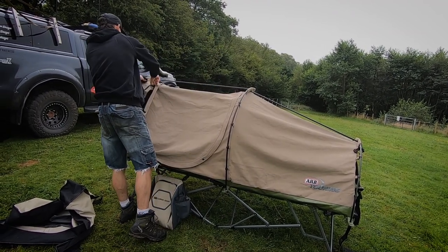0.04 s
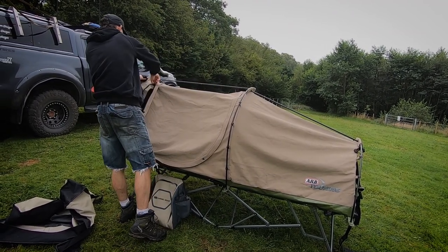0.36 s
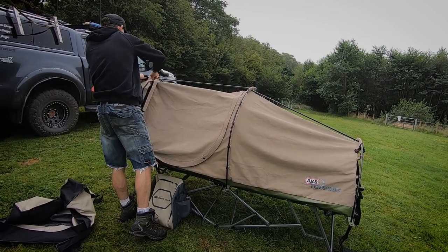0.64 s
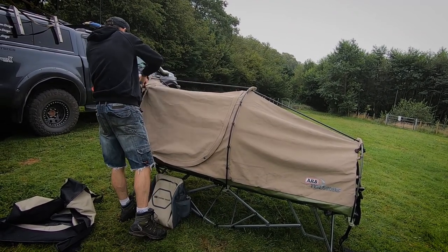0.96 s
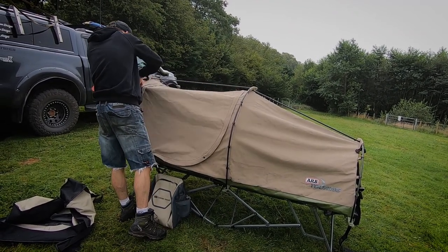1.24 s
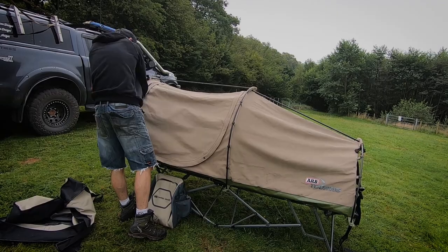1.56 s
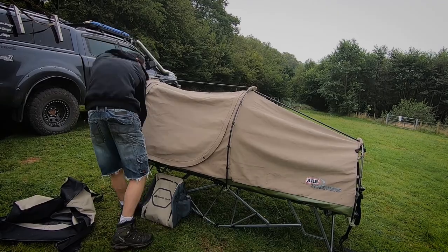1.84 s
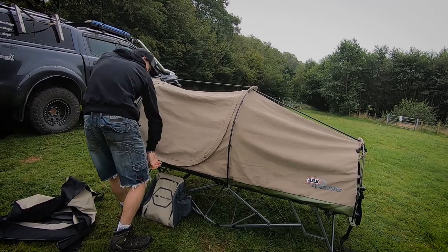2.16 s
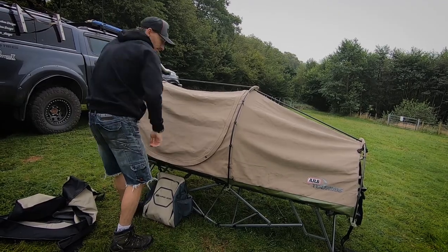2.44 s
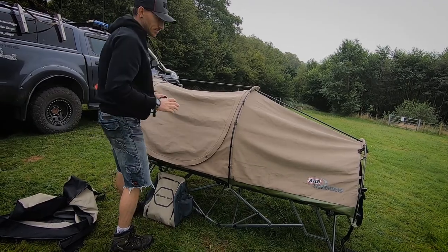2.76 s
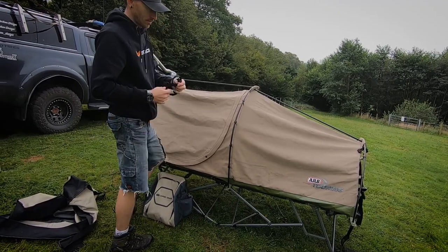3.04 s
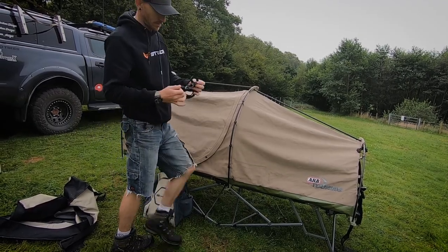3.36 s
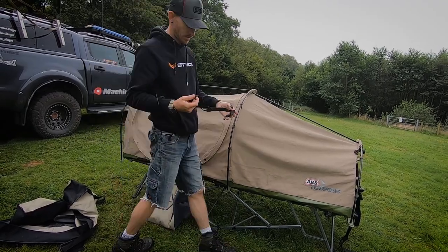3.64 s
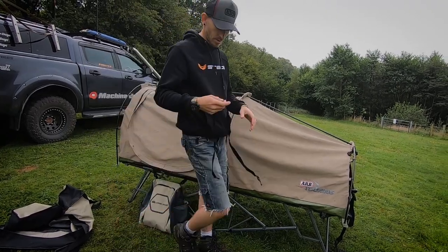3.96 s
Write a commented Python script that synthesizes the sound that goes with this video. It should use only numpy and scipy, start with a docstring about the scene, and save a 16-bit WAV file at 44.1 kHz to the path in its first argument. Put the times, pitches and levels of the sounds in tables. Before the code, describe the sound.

A tent zip rasps closed in uneven pulls and ends with a metallic clack outdoors.

```python
"""An open field, the microphone close to a canvas tent. A zip is drawn along the tent's edge:
a slow, catching pull, a short tug, then a long fast pull. The teeth buzz through the canvas and rasp
in the slider; the metal pull tabs jingle, and the slider clacks home at the end of the run.
Small birds call far off over the outdoor hush and a breeze rumbles on the microphone.
Late on, a shoe brushes the grass and a strap buckle clicks once."""
import sys
import numpy as np
from scipy import signal
from scipy.fft import rfft, irfft
from scipy.io import wavfile

SR = 44100
rng = np.random.default_rng(int(sys.argv[2]) if len(sys.argv) > 2 else 0)


def output_pcm(signal):
    """Save a mono or channel-first signal as 16-bit PCM at the path in sys.argv[1].

    Samples are clipped to [-1, 1] before scaling.
    """
    pcm = np.clip(np.atleast_2d(signal).T, -1, 1) * 32767
    wavfile.write(sys.argv[1], SR, np.round(pcm).astype(np.int16))


N = 176400
T = np.arange(N) / SR


def from_db(db):
    """Decibels to gain."""
    return 10 ** (np.asarray(db) / 20)


def rms_one(x):
    """Scale to unit rms."""
    return x / np.sqrt(np.mean(x ** 2) + 1e-20)


def in_time(rows):
    """Each column of a timed curve, at every sample."""
    times, *columns = np.transpose(rows)
    return [np.interp(T, times, column) for column in columns]


def during(rows):
    """One while a curve lasts, with 8 ms fades outside it."""
    return np.clip(np.minimum(T - rows[0][0], rows[-1][0] - T) / .008 + 1, 0, 1)


def drift(rate_hz):
    """Smooth random wander of unit rms."""
    hop, settle = 40, 2000
    pole = np.exp(-2 * np.pi * rate_hz * hop / SR)
    slow = signal.lfilter([1], [1, -2 * pole, pole * pole], rng.standard_normal(N // hop + settle + 2))
    slow = rms_one(slow[settle:])
    return np.interp(np.arange(N) / hop, np.arange(len(slow)), slow)


def colour(x, spectrum):
    """Minimum-phase filter of unit power gain that follows a spectrum's shape."""
    hz, db = np.transpose(spectrum)
    bin_hz = np.maximum(np.arange(N // 2 + 1) * SR / N, 1)
    gain = rms_one(from_db(np.interp(np.log(bin_hz), np.log(hz), db)))
    cepstrum = irfft(np.log(gain), N)
    cepstrum[1:N // 2] *= 2
    cepstrum[N // 2 + 1:] = 0
    return irfft(rfft(x) * np.exp(rfft(cepstrum)), N)


def noise(spectrum):
    """Coloured noise of about unit rms."""
    return colour(rng.standard_normal(N), spectrum)


def ring(clicks, pitches_hz, modes, spread_db):
    """Clicks ring a set of modes, each with a strength of its own at every hit."""
    out, hits = np.zeros(N), np.flatnonzero(clicks)
    for k, (hz, (db, t60)) in enumerate(zip(pitches_hz, modes)):
        radius, angle = from_db(-60 / (t60 * SR)), 2 * np.pi * hz / SR
        drive = np.full(N, 1e-18)
        drive[hits] = clicks[hits] * from_db(db + spread_db * rng.standard_normal(N)[hits])
        feedback = [1, -2 * radius * np.cos(angle), radius ** 2]
        out += (-1) ** k * signal.lfilter([0, np.sin(angle)], feedback, drive)
    return out


# The far hush of the field: (frequency [Hz], relative level [dB])
HUSH_SPECTRUM = [(25, -14.5), (40, -18.5), (64, -27), (110, -31.5), (170, -32), (280, -36.5), (400, -36),
                 (550, -37), (800, -31.5), (1100, -32), (1600, -38.5), (2480, -45), (4370, -49.5),
                 (7500, -55), (11000, -62.5), (16000, -69)]
# Its slight swell: (time [s], relative level [dB])
HUSH_SWELL = [(0.6, 1.5), (2.4, 2.5), (3.0, 1.5)]

def distant_hush(level_db=-50.5):
    """Open air in the distance, a soft noise whose level wavers."""
    return noise(HUSH_SPECTRUM) * from_db(level_db + in_time(HUSH_SWELL)[0] + 1.3 * drift(18))


# Breeze on the microphone: (time [s], level [dB])
BREEZE_LEVEL = [(0, -47), (0.5, -54.5), (1.2, -49), (1.85, -52.5), (2.2, -53.5), (4.0, -55.5)]
# Its rumble: (frequency [Hz], relative level [dB])
BREEZE_SPECTRUM = [(8, -23), (25, -5), (40, -5), (60, -4.5), (130, -15), (250, -28), (600, -49.5)]

def breeze(sway_hz=3.6, sway_db=-29.5):
    """Moving air rumbles at the microphone, over a slow sway of pressure."""
    rumble = noise(BREEZE_SPECTRUM) * from_db(in_time(BREEZE_LEVEL)[0])
    sway = signal.sosfilt(signal.butter(4, sway_hz, fs=SR, output="sos"), rng.standard_normal(N))
    return rumble + from_db(sway_db) * rms_one(sway)


# Small birds, far off: (time [s], length [s], start pitch [Hz], end pitch [Hz], relative level [dB])
BIRD_NOTES = [(2.286, 0.052, 3590, 3100, -61), (2.388, 0.03, 2940, 2920, -62.5),
              (2.413, 0.072, 5800, 5270, -62), (2.537, 0.077, 3890, 3790, -60),
              (2.734, 0.073, 5380, 5400, -62), (2.807, 0.037, 5040, 5270, -64),
              (3.179, 0.0516, 6160, 5680, -62), (3.54, 0.036, 4550, 4850, -61.5),
              (3.793, 0.049, 5080, 5040, -67)]

def distant_birds(direct_db=-2, echo_db=1, trees_t60_s=.5):
    """Thin gliding notes reach the microphone smeared by echoes from the trees."""
    calls, warble = np.zeros(N), 1 + .028 * drift(117.1)
    for start, length, start_hz, end_hz, db in BIRD_NOTES:
        progress = np.clip((T - start) / length, 0, 1)
        hz = (start_hz + (end_hz - start_hz) * progress) * warble
        envelope = np.sqrt(np.abs(np.sin(np.pi * progress)))
        calls += from_db(db) * envelope * np.sin(2 * np.pi * np.cumsum(hz) / SR)
    trees = rng.standard_normal(SR) * from_db(-60 * T[:SR] / trees_t60_s)
    echoes = signal.fftconvolve(calls, trees / np.linalg.norm(trees))[:N]
    return from_db(direct_db) * calls + from_db(echo_db) * echoes


# Grass underfoot: (frequency [Hz], relative level [dB])
GRASS_SPECTRUM = [(1500, -14), (4000, 1), (8000, 3), (15000, -11)]

def grass_step(at_s=3.76, width_s=.25, level_db=-68):
    """A shoe brushes the grass: one faint swell of hiss."""
    swell = np.exp(-.5 * ((T - at_s) / width_s) ** 2)
    return noise(GRASS_SPECTRUM) * from_db(level_db + drift(40)) * swell


# A strap buckle catching: (time [s], relative strength [dB])
BUCKLE_CLICKS = [(3.9772, -30), (3.9798, -54)]
# Its modes: (frequency [Hz])
BUCKLE_HZ = [740, 1400, 2200, 2900, 3700]
# Their ring, row for row: (relative level [dB], t60 [s])
BUCKLE_MODES = [(1, 0.012), (-4, .012), (-1.5, 0.0073), (-7, 0.011), (-12.5, .01)]

def strap_buckle():
    """Two contacts, heard as one click, ring the buckle's short-lived modes."""
    clicks = np.zeros(N)
    for start, db in BUCKLE_CLICKS:
        clicks[int(start * SR)] = from_db(db)
    return ring(clicks, BUCKLE_HZ, BUCKLE_MODES, spread_db=1) * from_db(-4)


# Jerks of the tent wall: (time [s], pitch [Hz], envelope peak [dB], length [s])
CANVAS_THUMPS = [(1.789, 270, -29, 0.015), (1.859, 83.5, -31.5, 0.025), (1.943, 170.4, -23.5, 0.0096),
                 (2.112, 510, -33.5, 0.019)]

def canvas_thumps():
    """A few cycles of flapping when the cloth snaps taut."""
    out = np.zeros(N)
    for start, hz, db, length in CANVAS_THUMPS:
        envelope = np.sin(np.pi * np.clip((T - start) / length, 0, 1)) ** 2
        out += from_db(db) * envelope * np.sin(2 * np.pi * hz * (T - start))
    return out


# Metal on metal, close up: (frequency [Hz], relative level [dB])
SNAP_SPECTRUM = [(300, -1), (1000, -17), (3200, -15.5), (4200, 4), (5300, -11.5), (6500, 0), (8200, 3),
                 (9500, -6.5), (12000, -5), (15500, -4.5)]

def metal_snap(clicks, decay_s, tail_s=.017, tail_db=-18, rise_s=.00041):
    """A brief burst of noise at each contact, followed by a weaker, longer tail."""
    burst = signal.lfilter([1], [1, -np.exp(-1 / (decay_s * SR))], clicks + 1e-18)
    tail = signal.lfilter([1], [1, -np.exp(-1 / (tail_s * SR))], clicks + 1e-18)
    rise = np.exp(-1 / (rise_s * SR))
    envelope = signal.lfilter([1 - rise], [1, -rise], burst + from_db(tail_db) * tail)
    return colour(envelope * rng.standard_normal(N), SNAP_SPECTRUM)


def metal_contacts(hits, pitches_hz, modes, snap_s, favour_db=9, favour_octaves=.15):
    """Each contact gives a dry snap and rings the modes, favouring those near its own pitch."""
    ringing, clicks, t = np.zeros(N + SR), np.zeros(N), T[:SR // 4]
    for time_s, snap_db, ring_db, favoured_hz in hits:
        start = int(time_s * SR)
        clicks[start] += from_db(snap_db)
        for hz, (mode_db, t60) in zip(pitches_hz, modes):
            boost_db = favour_db * np.exp(-(np.log2(hz / favoured_hz) / favour_octaves) ** 2)
            envelope = from_db(ring_db + mode_db + boost_db - 60 * t / t60)
            ringing[start:start + len(t)] += envelope * np.sin(2 * np.pi * (hz * t + rng.random()))
    return ringing[:N] + metal_snap(clicks, snap_s)


# Tabs knocking on the slider: (time [s], snap [dB], relative ring [dB], favoured pitch [Hz])
TAB_KNOCKS = [(0.6497, -62, -46, 4310), (0.7215, -66, -43, 4310), (0.7529, -62, -48, 14020),
              (0.7864, -57, -54, 4310), (0.8088, -44, -41, 7300), (0.826, -42, -39, 7300),
              (0.8507, -59, -41, 14020), (0.8752, -41, -48, 14020), (0.888, -41.5, -51, 7300),
              (0.9221, -44, -45, 4310), (0.948, -37.5, -30, 4250), (0.954, -50, -37, 10270),
              (0.966, -41, -34, 7300), (0.9805, -42, -37, 7300), (1.0398, -46, -35.5, 4310),
              (1.0927, -45, -39, 5430), (1.2533, -51, -48, 7300), (1.3342, -51, -39, 6300),
              (1.4883, -42, -54, 7300), (1.7722, -42, -42, 10270), (1.8879, -55, -43, 10270)]
# Tabs swinging: (time [s], relative strength [dB])
TAB_JINGLE = [(0.6, -62), (0.72, -51), (0.77, -47), (0.97, -48), (1.08, -51), (1.14, -72), (1.29, -73),
              (1.35, -51), (1.45, -66), (1.63, -59), (1.7, -57), (1.9, -57), (2.1, -56), (2.2, -66)]
# The tabs' modes: (frequency [Hz])
TAB_HZ = [3840, 4310, 4570, 5400, 6290, 6410, 7300, 8550, 10270, 10390, 14020, 14200]
# Their ring, row for row: (relative level [dB], t60 [s])
TAB_MODES = [(-21, .05), (-19, .1), (-26, .03), (-20, .05), (-24, .06), (-24, .06), (-18, .02), (-22, .03),
             (-19, .09), (-19, .09), (-23, .1), (-29, .12)]

def pull_tabs(touches_per_s=100):
    """The metal tabs knock now and then, and jingle with light random touches as they swing."""
    touches = rng.random(N) < touches_per_s / SR
    strength = from_db(in_time(TAB_JINGLE)[0] + 3 * rng.standard_normal(N)) * during(TAB_JINGLE)
    jingle = ring(touches * strength, TAB_HZ, TAB_MODES, spread_db=4)
    return jingle + metal_contacts(TAB_KNOCKS, TAB_HZ, TAB_MODES, snap_s=.0021)


# Clacks as the zip closes: (time [s], snap [dB], relative ring [dB], favoured pitch [Hz])
STOP_HITS = [(2.0191, -36, -45, 6300), (2.0222, -36, -33, 7900), (2.1392, -25.5, -33.5, 4640),
             (2.1478, -25.5, -30.5, 6300), (2.156, -40, -46, 14260), (2.162, -49, -31, 10300),
             (2.171, -39, -39, 2130), (2.2122, -45, -53, 6400), (2.2586, -59, -54, 10300)]
# The slider's modes: (frequency [Hz])
SLIDER_HZ = [2130, 4430, 4640, 5450, 6300, 6420, 7900, 8660, 10280, 10520, 11590, 14260]
# Their ring, row for row: (relative level [dB], t60 [s])
SLIDER_MODES = [(-16, .04), (-13, .06), (-4, .02), (-10, .02), (-5, .022), (-12, .04), (-5, .015),
                (-8, .022), (-10, .055), (-2.5, .016), (-12, .02), (-8, .08)]

def end_stop():
    """The slider hits the other slider and the end stop, then settles."""
    return metal_contacts(STOP_HITS, SLIDER_HZ, SLIDER_MODES, snap_s=.0015)


def shifting_contact(rasp, band_hz=1200, spread_db=3.2):
    """Each band of the rasp swells and fades on its own as the contact points change."""
    out, spectrum, bin_hz = np.zeros(N), rfft(rasp), np.arange(N // 2 + 1) * SR / N
    for centre_hz in range(0, 18000, band_hz):
        band = np.clip(1 - np.abs(bin_hz - centre_hz) / band_hz, 0, 1)
        out += irfft(spectrum * band, N) * from_db(spread_db * drift(70))
    return out


# Friction in the slider, close up: (time [s], level [dB])
RASP_LEVEL = [(0.6, -84), (0.71, -75), (0.76, -53), (0.82, -60.5), (0.89, -55.5), (0.91, -63), (0.96, -49),
              (1.0, -75), (1.1, -55), (1.14, -78), (1.28, -71), (1.315, -51.5), (1.35, -53), (1.41, -55.5),
              (1.49, -55.5), (1.6, -64), (1.75, -61.5), (1.89, -61), (2.0, -55), (2.11, -51.5),
              (2.135, -44.5), (2.18, -58), (2.2, -70)]
# Its bright rasp: (frequency [Hz], relative level [dB])
RASP_SPECTRUM = [(200, -45), (800, -17), (2300, 2), (3000, 2.5), (4000, -6), (5000, -1.5), (6000, -0.5),
                 (7300, 0.5), (8500, -1.5), (9800, -5.5), (12000, -11), (15500, -11)]
# Canvas rubbing as it is drawn together: (time [s], level [dB])
RUB_LEVEL = [(0.62, -59), (0.73, -51), (0.81, -49), (0.86, -53), (0.95, -45), (1.01, -57), (1.09, -45),
             (1.17, -64), (1.28, -58), (1.33, -48), (1.42, -53), (1.5, -62), (1.65, -59), (1.8, -49.5),
             (1.95, -51), (2.08, -50.5), (2.17, -48.5), (2.2, -68)]
# Its dull rustle: (frequency [Hz], relative level [dB])
RUB_SPECTRUM = [(60, 4), (150, 5), (350, 0.5), (700, -3), (1100, -6), (1600, -3), (2200, -9), (3000, -19.5),
                (6000, -29)]

def rasp_and_rub(teeth, tick_share=.18, decay_per_tooth=.9):
    """Every tooth ticks and scrapes with its own strength, bright in the slider and dull in the cloth."""
    force = rng.standard_normal(N)[teeth.astype(int)]  # one draw per tooth
    scrapes = rms_one(from_db(3 * force) * np.exp(-decay_per_tooth * (teeth % 1)))
    new_tooth = np.diff(np.floor(teeth), prepend=0)
    ticks = rms_one(new_tooth * from_db(5 * np.clip(force, -2, 2)))
    friction = tick_share * ticks + np.sqrt(1 - tick_share ** 2) * scrapes * rng.standard_normal(N)
    rasp = shifting_contact(colour(friction, RASP_SPECTRUM))
    rasp *= from_db(in_time(RASP_LEVEL)[0] + 2 * drift(42))
    rub = colour(scrapes * rng.standard_normal(N), RUB_SPECTRUM) * from_db(in_time(RUB_LEVEL)[0])
    return rasp * during(RASP_LEVEL) + rub * during(RUB_LEVEL)


# Resonances of the zip's chain: (frequency [Hz], gain [dB])
CHAIN_RESONANCES = [(900, -18), (1600, -6), (2250, -1), (3200, -5), (3900, 1), (5200, -11), (7600, -8),
                    (8450, 0), (9800, -14)]

def chain_whine(teeth, db_per_octave=11, reference_hz=650):
    """At speed the teeth strike evenly; their upper harmonics sweep through the chain's resonances."""
    whine, tooth_hz = np.zeros(N), np.gradient(teeth) * SR
    hz, db = np.transpose(CHAIN_RESONANCES)
    for order in range(3, 19):
        gain = from_db(np.interp(order * tooth_hz, hz, db) + 3.2 * drift(80))
        whine += gain * np.sin(2 * np.pi * order * teeth)
    level_db = in_time(RASP_LEVEL)[0] + db_per_octave * np.log2(tooth_hz / reference_hz)
    return whine * from_db(level_db) * during(RASP_LEVEL)


# The zip's three pulls, close to the microphone:
# (time [s], tooth rate [Hz], relative fundamental level [dB], relative octave level [dB])
SLOW_PULL = [(0.7, 105, -55, -59), (0.73, 150.5, -45, -57), (0.768, 202.3, -38.5, -47.5),
             (0.793, 133.5, -39, -67), (0.816, 194, -49, -40), (0.832, 142.7, -33.5, -52),
             (0.872, 141.4, -35, -43.5), (0.892, 186.8, -56, -53), (0.91, 306.6, -45, -50),
             (0.928, 327.8, -37, -44), (0.948, 276.4, -44, -48), (0.962, 148, -49, -41),
             (0.99, 134.8, -48, -64)]
SHORT_TUG = [(1.04, 129.1, -71, -69), (1.076, 112.4, -38, -43.5), (1.101, 133.2, -60, -66.5),
             (1.12, 121.5, -34.5, -47), (1.155, 79.3, -67, -61)]
LONG_PULL = [(1.298, 339.6, -56, -46), (1.31, 425.4, -34, -52), (1.325, 547.7, -37.5, -44),
             (1.334, 713.3, -46, -51), (1.346, 767.4, -37, -39.5), (1.357, 848, -36, -38.5),
             (1.378, 723, -46, -36), (1.389, 687.7, -57, -43.5), (1.402, 625.4, -41.5, -46),
             (1.422, 521, -45, -44.5), (1.443, 400.3, -43, -51.5), (1.468, 329.9, -42, -44),
             (1.499, 325.7, -33.5, -45), (1.553, 416.8, -45, -56.5), (1.589, 465.2, -47, -49.5),
             (1.647, 434.4, -59.5, -52), (1.714, 323.4, -41, -46), (1.773, 428.2, -48, -53),
             (1.795, 288.4, -36.5, -54), (1.815, 371.3, -38.5, -51), (1.851, 400, -42, -49),
             (1.889, 352.7, -40.5, -49), (1.923, 295.8, -35, -48), (1.975, 398.6, -44.5, -45.5),
             (2.015, 418, -46.5, -43.5), (2.031, 276.9, -43, -47), (2.049, 277, -43, -46.5),
             (2.077, 384.8, -41.5, -42.5), (2.099, 343.7, -54, -45.5), (2.135, 240.8, -71, -50)]

def canvas_buzz(teeth, canvas_cutoff_hz=1700, trim_db=-1, flutter_db=2.7):
    """The teeth shake the canvas at their passing rate; it radiates only the low harmonics."""
    buzz, overtones, phase = np.zeros(N), np.zeros(N), 2 * np.pi * teeth
    for order in range(3, 9):
        overtone_db = -8 - 2.4 * (order - 3) + 2 * drift(25)  # relative to the octave
        overtones += from_db(overtone_db) * np.sin(order * phase)
    overtones = signal.sosfilt(signal.butter(2, canvas_cutoff_hz, fs=SR, output="sos"), overtones)
    upper = np.sin(2 * phase) + overtones
    for pull in (SLOW_PULL, SHORT_TUG, LONG_PULL):
        _, fundamental_db, octave_db = in_time(pull)
        buzz += during(pull) * (from_db(fundamental_db) * np.cos(phase) + from_db(octave_db) * upper)
    return np.sqrt(2) * buzz * from_db(trim_db + flutter_db * drift(115))


def teeth_passed(speed_jitter=.025):
    """Running count of the teeth through the slider, at a slightly unsteady speed."""
    tooth_hz = in_time([*SLOW_PULL, *SHORT_TUG, *LONG_PULL])[0]
    return np.cumsum(tooth_hz * (1 + speed_jitter * drift(90))) / SR


def scene():
    """One microphone: the zip in front, the buckle, and the field all around."""
    teeth = teeth_passed()
    zip_run = canvas_buzz(teeth) + chain_whine(teeth) + rasp_and_rub(teeth)
    knocks = pull_tabs() + end_stop() + canvas_thumps() + strap_buckle()
    field = distant_birds() + distant_hush() + grass_step() + breeze()
    return (zip_run + knocks + field)[None]


def record(dry, cutoff_hz=15750):
    """A steep low-pass takes the very top off the microphone's signal."""
    return signal.sosfilt(signal.ellip(10, .2, 80, cutoff_hz, fs=SR, output="sos"), dry)


dry = scene()
out = record(dry)
output_pcm(out)
```